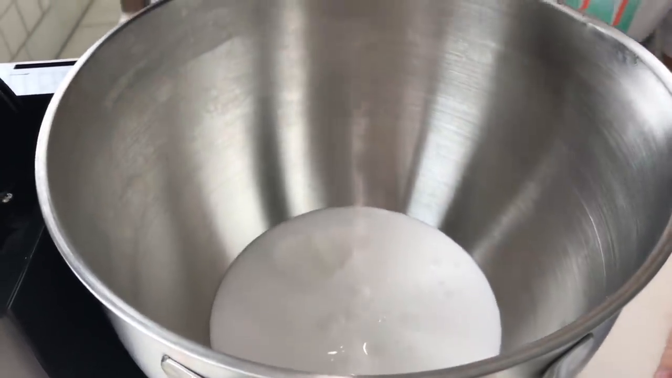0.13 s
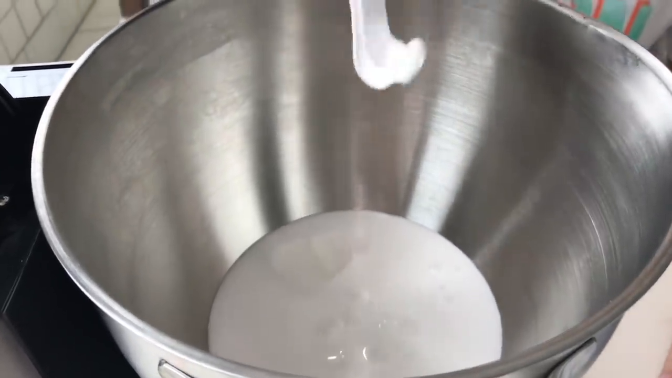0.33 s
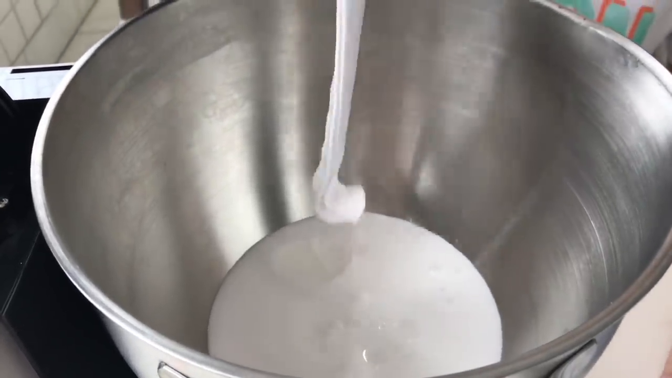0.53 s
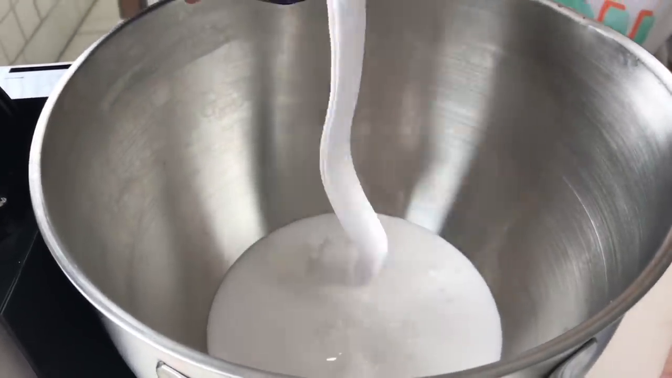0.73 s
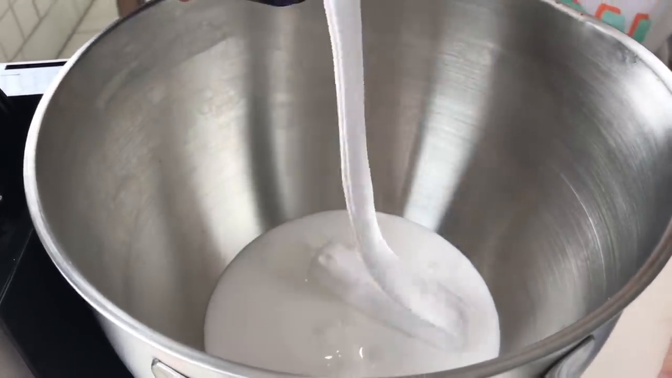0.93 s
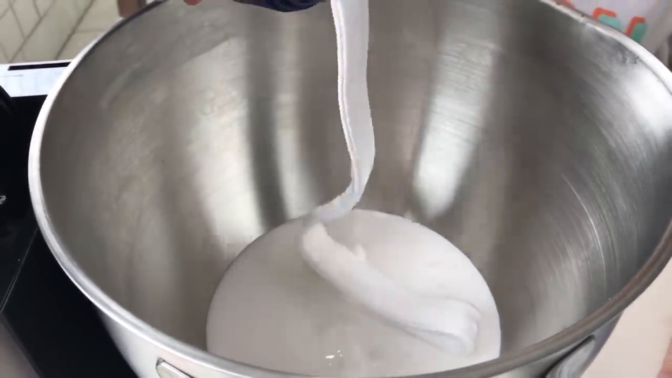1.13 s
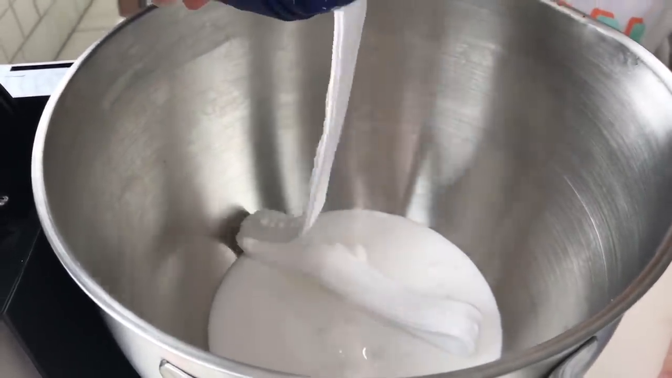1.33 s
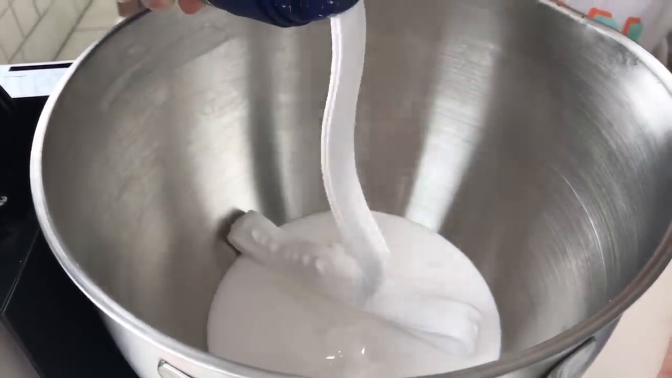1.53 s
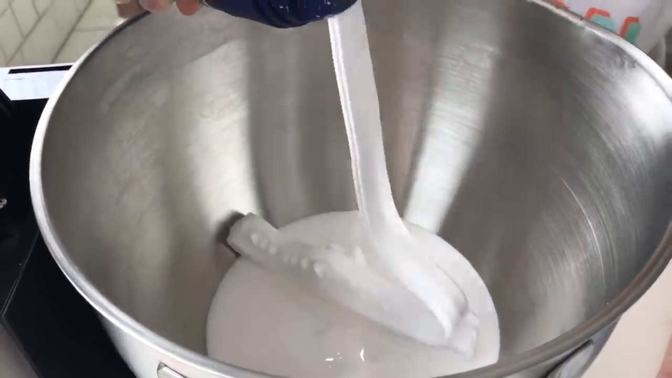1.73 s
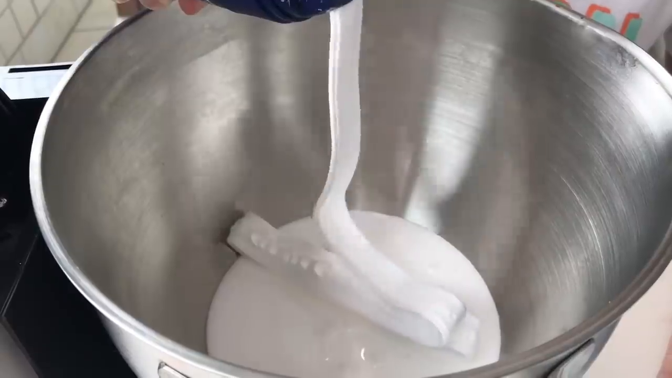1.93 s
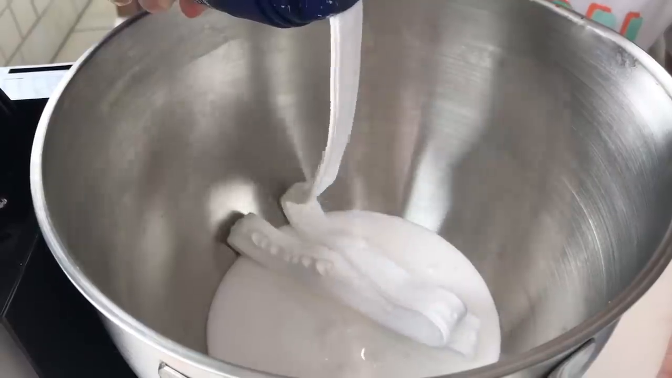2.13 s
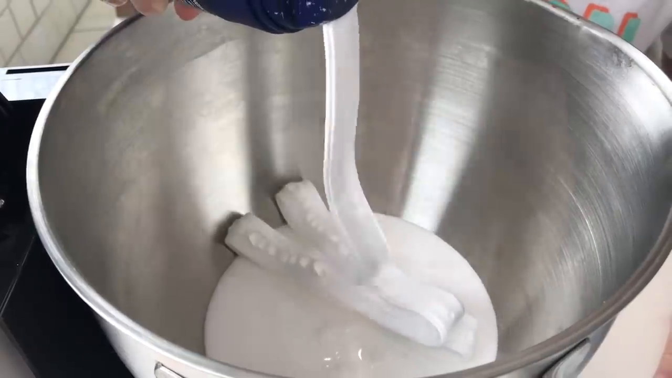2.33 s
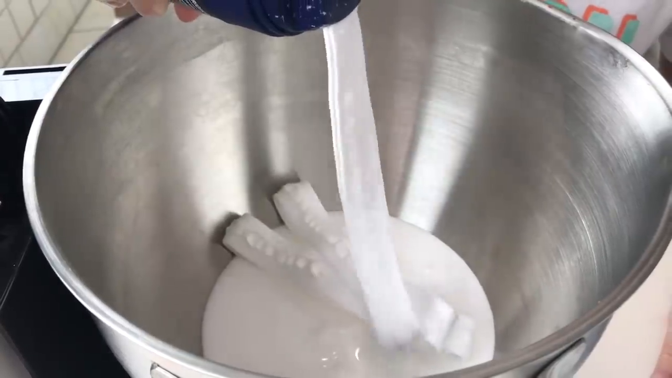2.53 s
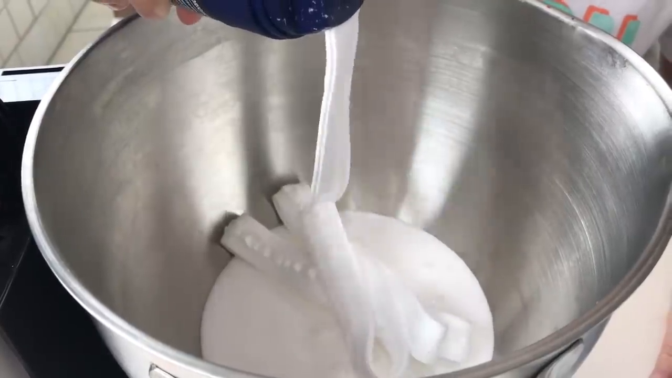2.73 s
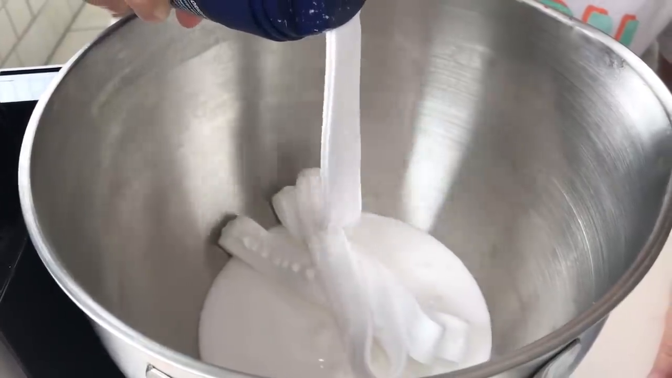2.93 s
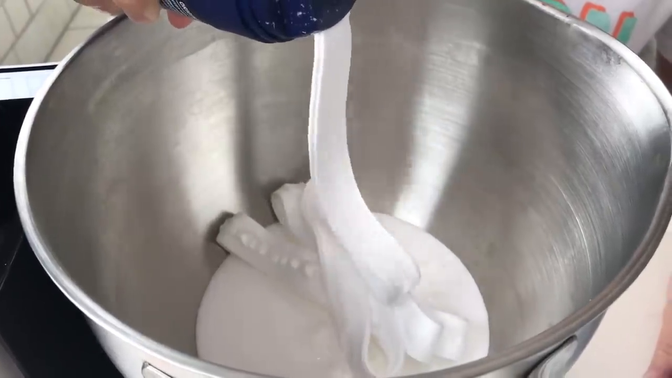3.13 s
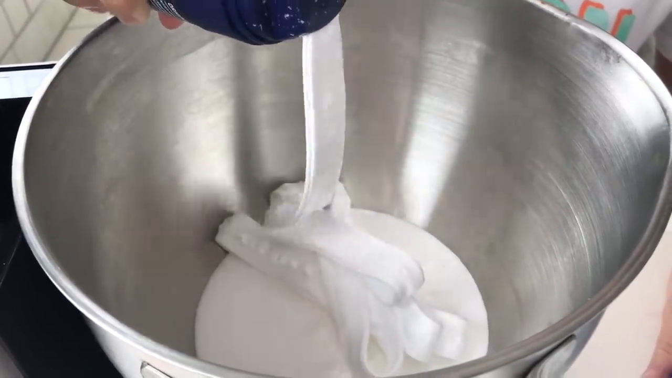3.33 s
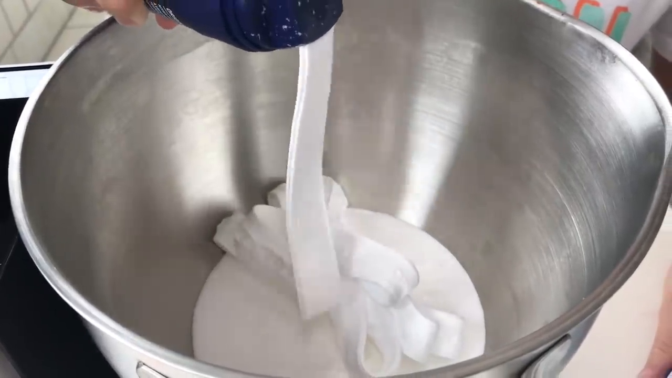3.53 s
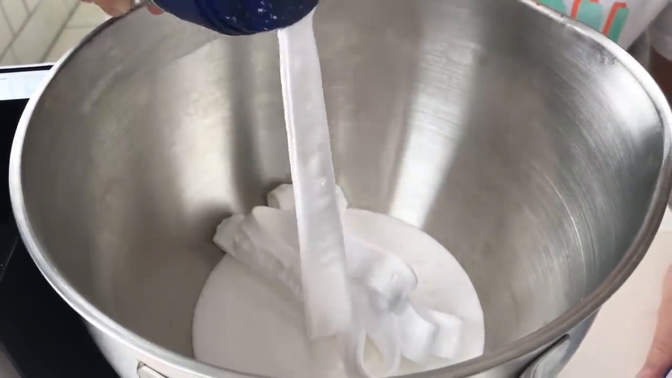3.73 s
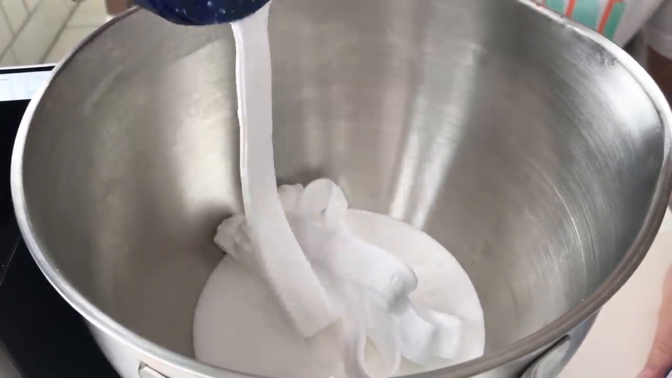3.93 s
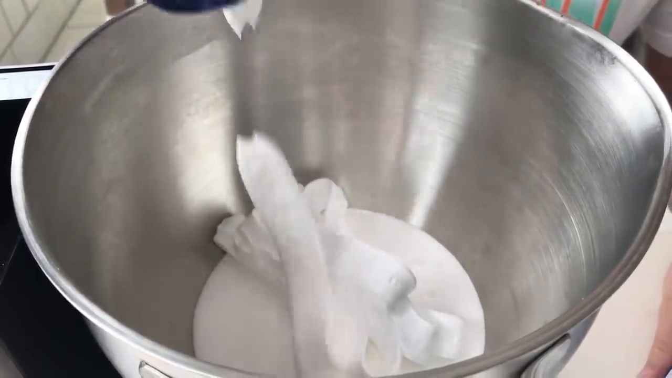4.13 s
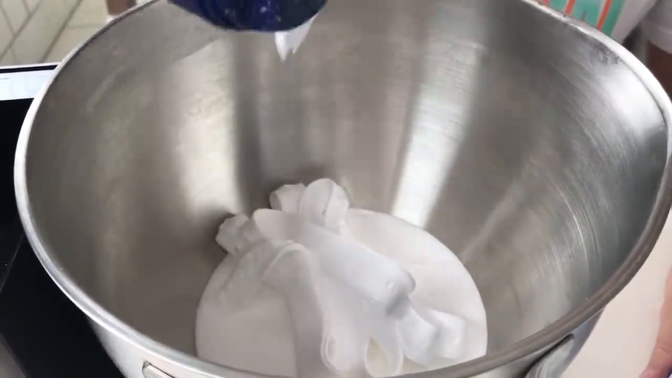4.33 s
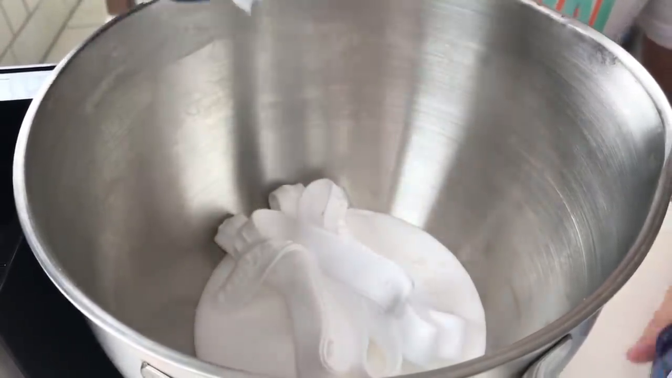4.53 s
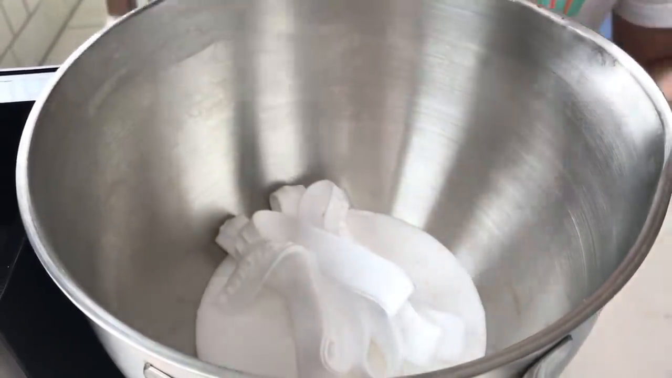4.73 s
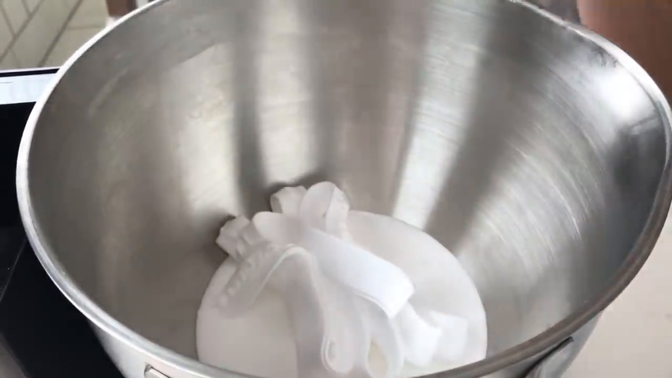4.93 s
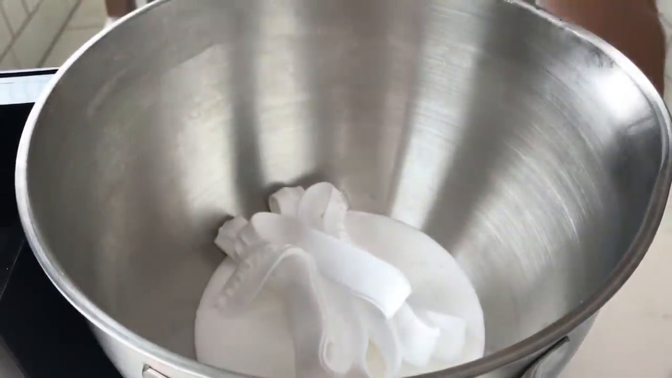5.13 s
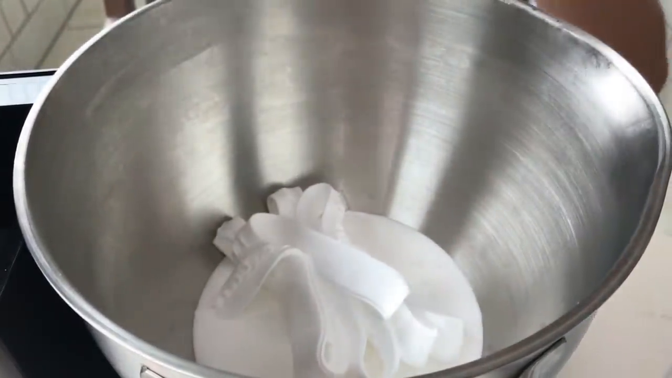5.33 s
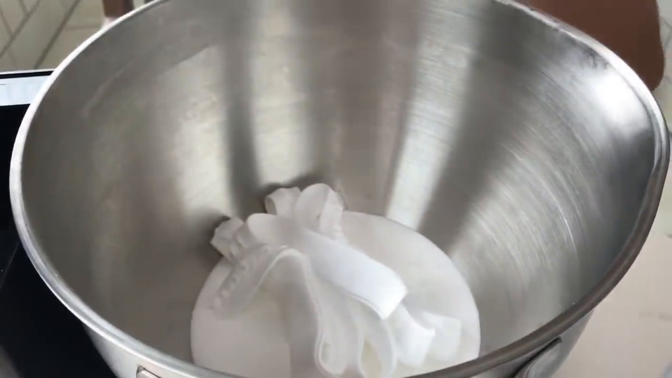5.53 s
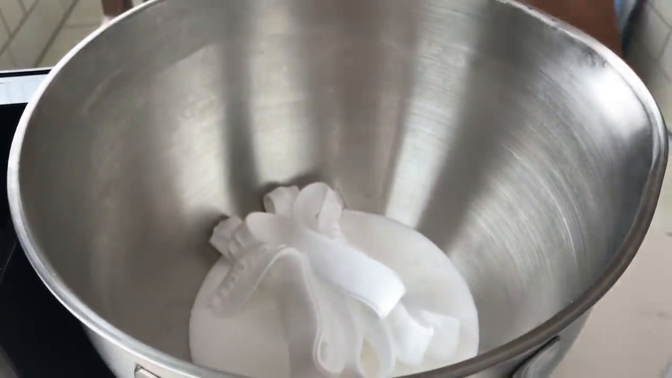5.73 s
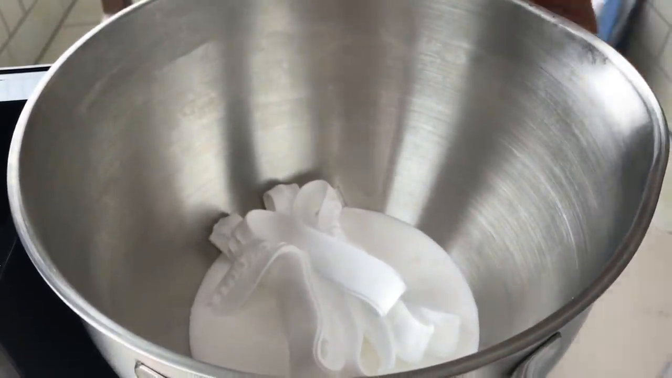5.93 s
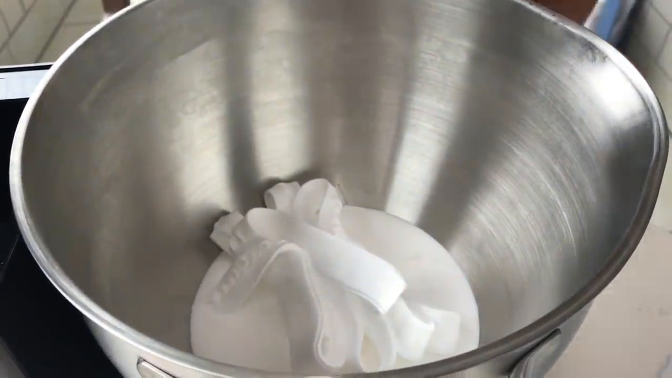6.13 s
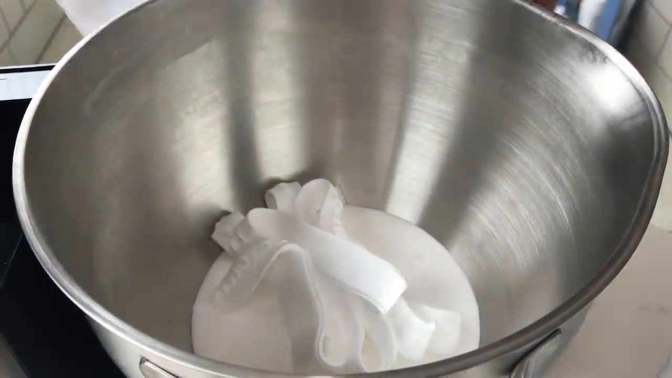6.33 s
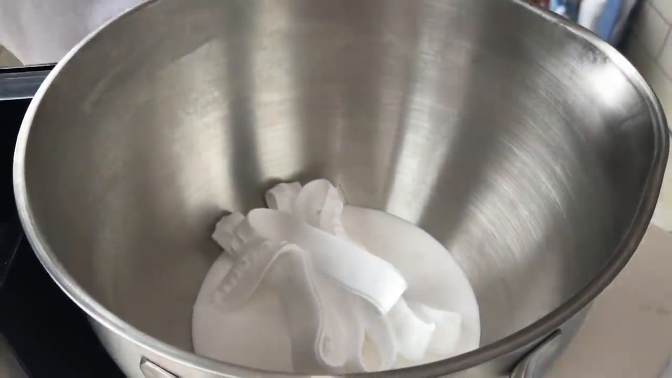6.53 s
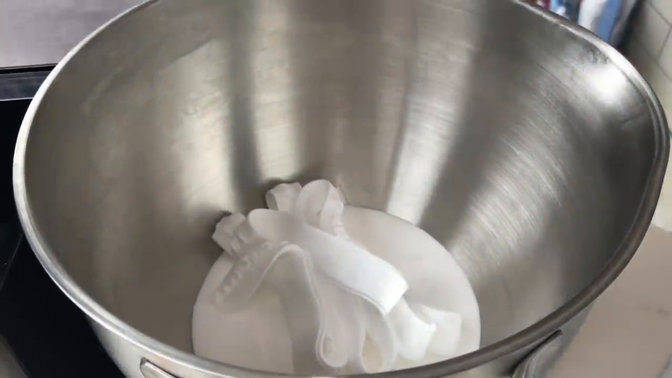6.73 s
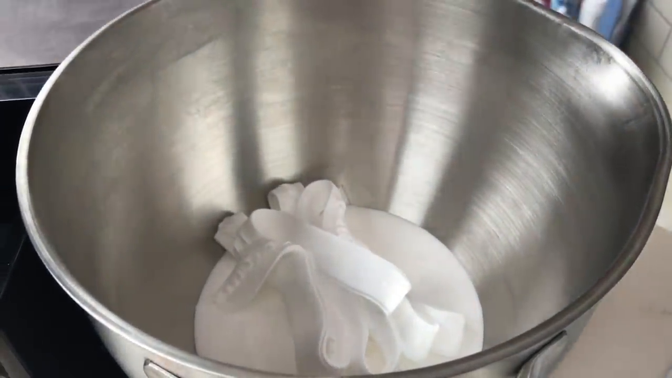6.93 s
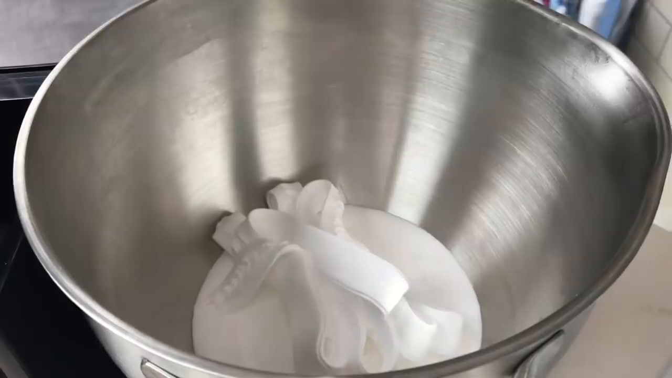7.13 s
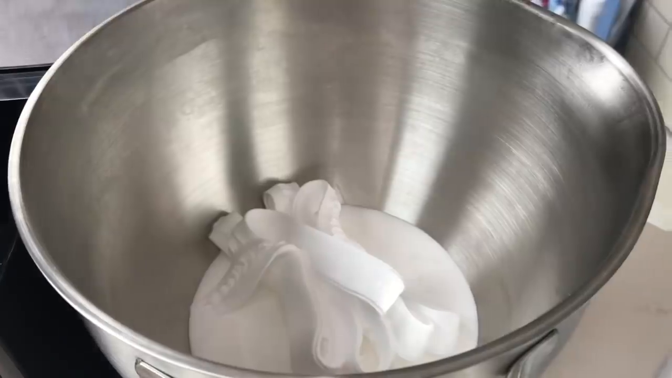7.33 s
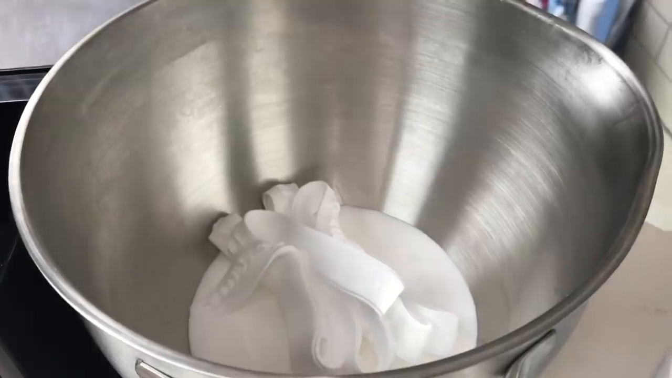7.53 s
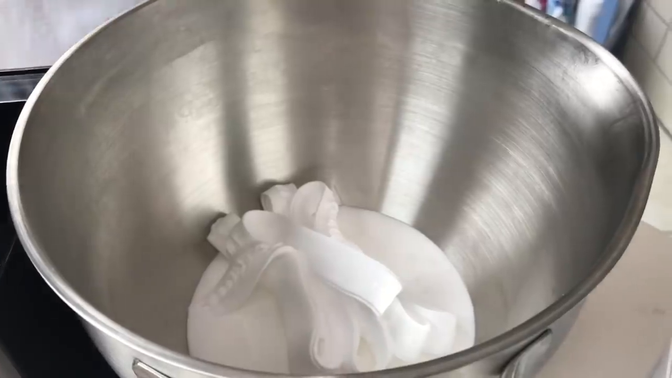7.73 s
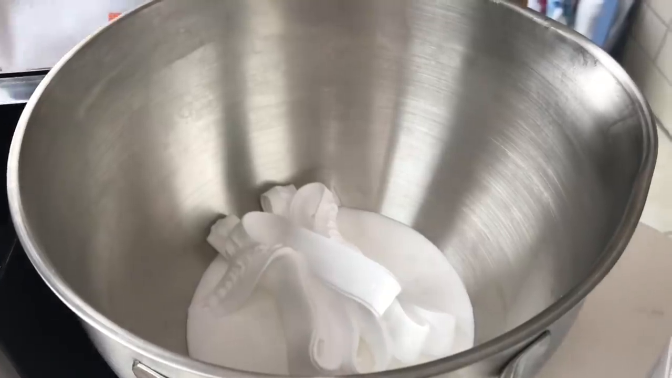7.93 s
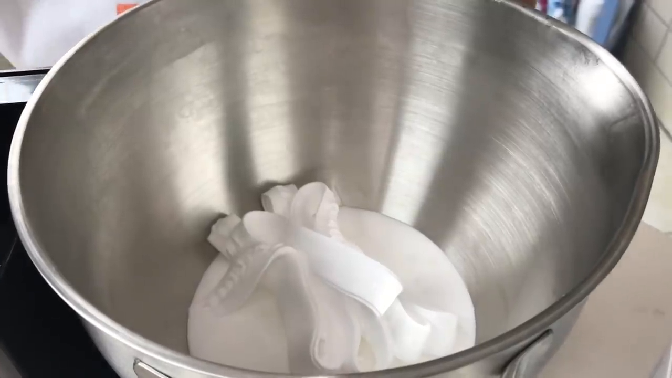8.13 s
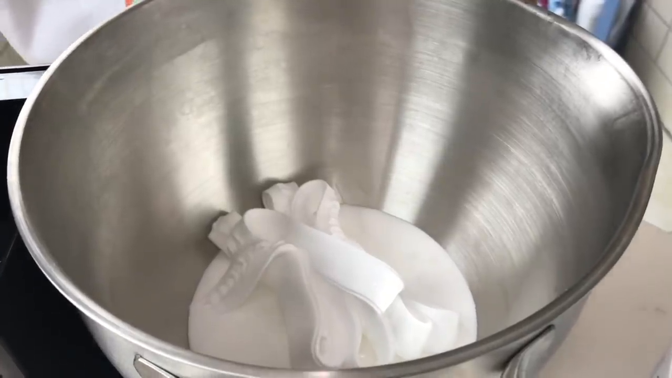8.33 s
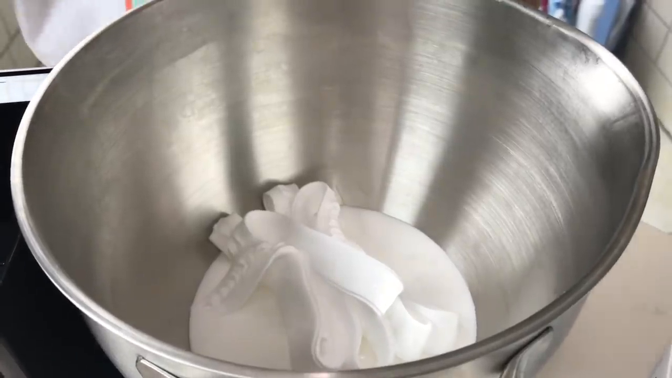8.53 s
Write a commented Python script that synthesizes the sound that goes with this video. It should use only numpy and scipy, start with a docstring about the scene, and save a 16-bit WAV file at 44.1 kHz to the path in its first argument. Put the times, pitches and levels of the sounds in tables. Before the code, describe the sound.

Foam hisses and crackles from a spray can into a metal bowl and cuts off, followed by light plastic knocks in a small room.

```python
"""An aerosol can sprays foam into a steel mixing bowl in a small hard-walled room.
Bare gas rushes out first, then foam sputters through the nozzle: a roar full of bursting gas pockets,
coloured by the bowl. Afterwards the plastic cap is handled and knocked, and something hollow drops
and bounces. Cloth and hands rustle over a low room hum."""
import sys
import numpy as np
from scipy import signal
from scipy.fft import rfft, irfft, next_fast_len
from scipy.io import wavfile

SR = 44100
rng = np.random.default_rng(int(sys.argv[2]) if len(sys.argv) > 2 else 0)


def put_to_file(sound):
    """Save the sound as 16-bit audio at rate SR, in the file named by the first command-line argument."""
    columns = np.atleast_2d(sound).T  # one column per channel
    safe = np.clip(columns, -1, 1)
    whole_steps = np.round(safe * 32767)
    wavfile.write(sys.argv[1], SR, whole_steps.astype(np.int16))


N = 383096
FFT_SIZE = next_fast_len(N + SR)
HZ = np.maximum(np.arange(FFT_SIZE // 2 + 1) * SR / FFT_SIZE, 1)
TIME = np.arange(N) / SR

# Table levels are relative, ahead of the mix gains.
# room hum (frequency [Hz], density [dB])
HUM_SPECTRUM = [(12, -57.5), (20, -22), (44, -14), (101, -3.5), (172, -8), (192, -16.5), (227, -5.5),
                (300, -16), (604, -18.5), (714, -18.5), (1150, -19), (2810, -35), (3710, -34.5),
                (4040, -37), (15900, -45.5)]
# room decay (frequency [Hz], T60 [s])
ROOM_T60 = [(200, 0.33), (600, 0.41), (1500, 0.39), (4000, 0.33), (10000, 0.05)]
# cloth and skin (time [s], half-width [s], dull level [dB], bright level [dB])
SWISHES = [(4.657, 0.065, -62, -63), (4.854, 0.12, -53.5, -59.5), (5.156, 0.015, -44, -44),
           (5.29, 0.06, -45, -44), (5.51, 0.016, -61, -49), (5.668, 0.14, -54, -55),
           (5.913, 0.018, -65.5, -47.5), (6.117, 0.091, -53.5, -52.5), (6.303, 0.13, -53, -53.5),
           (6.876, 0.051, -65.5, -44.5), (7.747, 0.043, -53.5, -56), (8.16, 0.08, -63, -56),
           (8.544, 0.038, -62, -54.5)]
# faint rubbing tones (time [s], half-width [s], level [dB], pitch [Hz])
SQUEAKS = [(6.057, 0.54, -52, 1686), (6.86, 0.1, -53, 2510)]
# hollow object landing (time [s], level [dB], tilt [dB/octave])
BOUNCES = [(7.434, 6.5, 7.5), (7.4425, 0, -4.5), (7.619, -4.5, 3), (7.777, -8, 0.5)]
# its modes (frequency [Hz], level [dB], T60 [s])
HOLLOW_MODES = [(271.6, -32, 0.57), (558, -25, 0.46), (617, -17.5, 0.36), (743, 4.5, 0.0062),
                (985, 8, 0.015), (1059, 2, 0.034), (1217, 3.5, 0.013), (1480, -4.5, 0.028),
                (1624, -5.5, 0.04), (1854, -5.5, 0.03), (2093, -9, 0.047), (2365, -3.5, 0.031),
                (2840, -2, 0.005), (3280, -12, 0.032), (4960, -20, 0.0036), (7400, -35, 0.0053)]
# dry cracks, alone or starting a knock (time [s], body level [dB], treble level [dB])
TICKS = [(0.313, -21, -14), (1.803, -16, -11.5), (3.3688, -0.5, -14), (4.616, -42, -44),
         (5.0723, -38, -43.5), (5.14, -17.5, -27), (5.169, -32, -27), (5.22, -37, -32), (5.3263, -24, -49),
         (5.3735, -17.5, -43), (5.4778, -21.5, -39), (5.505, -28, -38), (5.604, -30, -44),
         (5.8204, -24.5, -42), (5.8671, -38, -51), (5.904, -44, -44), (6.3654, -12, -32), (7.4337, 2, -20),
         (7.54, -22, -52), (7.6195, -13, -51), (7.7756, -22.5, -57), (8.096, -21.5, -34.5),
         (8.5214, -30.5, -38)]
# blows on the worktop (time [s], level [dB], tilt [dB/octave])
THUDS = [(4.750, -28, 3), (5.376, -14.5, -4.5), (5.479, -6.5, -6), (6.365, -28.5, 11.5), (7.435, -33, -7)]
# its modes (frequency [Hz], level [dB], T60 [s])
WORKTOP_MODES = [(107, -36, 0.043), (172, -20.5, 0.25), (217, -27.5, 0.12), (266, -12.5, 0.04),
                 (307, 5.5, 0.03)]
# cap knocking on the can (time [s], level [dB], tilt [dB/octave])
CAP_HITS = [(5.139, -19, -5), (5.168, -19, 9), (5.324, -7.5, -0.5), (5.360, -5.5, -9), (6.365, -18, 3)]
# its modes (frequency [Hz], level [dB], T60 [s])
CAP_MODES = [(517, -24, 0.014), (945, -3, 0.021), (1240, -5.5, 0.0056), (1733, -4, 0.015),
             (2680, -20, 0.016), (4410, -21, 0.018)]
# cap rubbing along its seat (time [s], level [dB])
CAP_SLIDE = [(5.12, -49), (5.184, -48), (5.308, -41), (5.364, -56), (5.45, -59.5)]
# whistles as the valve opens and as foam arrives
# (time [s], level [dB], pitch [Hz], bandwidth [Hz], rise [s], fall [s])
WHISTLES = [(0.029, -11.5, 4050, 150, 0.0047, .008), (.035, -9.5, 6220, 250, 0.0066, .01),
            (0.041, -10, 9760, 300, 0.0093, .015), (.169, 2.5, 4400, 600, 0.0091, .005)]
# bare gas (frequency [Hz], density [dB])
RUSH_SPECTRUM = [(40, -30), (300, -32.5), (1000, -19), (2500, -13), (3500, -8.5), (6000, -3.5), (9000, -2),
                 (16000, -2)]
# empty nozzle resonances (frequency [Hz], width [Hz], gain [dB])
NOZZLE_MODES = [(3500, 280, 15), (5640, 480, 6.5), (6900, 200, 4.5), (8610, 380, 9), (10340, 230, 10),
                (11060, 170, 10), (11850, 450, 9.5), (13850, 450, 6.5), (14500, 200, 5.5), (15060, 200, 6)]
# foam flow (time [s], level [dB], small pockets re flow [dB], thin pockets re flow [dB],
# centre pitch of small pockets and pops [Hz])
FOAM_FLOW = [(0.102, -32, 8.5, 9.5, 3880), (0.17, -29, 4.5, 14.5, 3950), (0.22, -29, 8, 3.5, 3780),
             (0.35, -26.5, -4.5, -2.5, 3700), (0.42, -24, 1.5, -2.5, 2950), (0.62, -24, 5.5, 0, 3330),
             (0.8, -22.5, -0.5, -6.5, 4100), (1.3, -25, 3, -4.5, 3530), (1.7, -22, -6, -8.5, 3500),
             (2.301, -22, -8, -9.5, 3500), (2.7, -21.5, 0, -4.5, 2950), (2.901, -19.5, -2.5, -3, 3100),
             (3.35, -21, 1.5, 1.5, 3500), (3.45, -22, 4, 5, 3360), (3.63, -19.5, -5.5, -4.5, 3320)]
# foam roar (frequency [Hz], density [dB])
ROAR_SPECTRUM = [(60, -36), (150, -5.5), (500, -4), (1000, -8.5), (1300, -0.5), (1800, -1.5), (2500, -18.5),
                 (5000, -17), (16000, -31)]
# gas hiss in the foam (frequency [Hz], density [dB])
HISS_SPECTRUM = [(100, -31), (1000, -28.5), (2500, -16.5), (3500, -14), (6000, -2), (9000, 6),
                 (16000, -0.5)]
# thin, high pockets (time [s], centre pitch [Hz])
THIN_PITCH = [(0.2, 6000), (0.65, 7200), (1.5, 6300), (2.2, 7400), (3.0, 6800), (3.4, 6000)]
# biggest pockets bursting (time [s], level [dB], pitch [Hz])
BURSTS = [(0.3215, 4, 4300), (0.3673, -4, 2630), (0.3954, 6, 2980), (0.4354, 4, 2700), (0.477, 4.5, 2770),
          (0.5305, -7, 2660), (0.5685, 3, 2600), (0.603, 0.5, 2680), (0.654, 1, 2680), (0.685, 3, 2650),
          (0.7543, 1, 4470), (0.7787, 0.5, 4300), (0.89, 1.5, 3190), (0.9524, 8.5, 4400), (1.0714, 9, 4040),
          (1.098, 4, 3620), (1.1665, -3.5, 2540), (1.1904, 3.5, 3170), (1.2346, 4, 3700),
          (1.3769, -4, 4460), (1.544, -16, 3300), (1.5973, -8, 2700), (1.6276, 0.5, 2710),
          (1.8005, 3, 3800), (1.905, -8, 2640), (2.099, -14, 3230), (2.204, 1, 3780), (2.2417, -1, 4370),
          (2.2671, 4, 4300), (2.3053, -3.5, 2580), (2.403, -2, 4230), (2.6792, -2.5, 3150),
          (2.7175, -4, 3850), (2.7423, -16, 2160), (2.883, -6, 2180), (3.103, -1, 3200), (3.133, 3, 3750),
          (3.156, 4, 3700), (3.3393, 3, 3560), (3.3702, 10.5, 3770)]
# air resonances and dips of the bowl (frequency [Hz], width [Hz], gain [dB])
BOWL_MODES = [(212.2, 22, 10.5), (537, 40, 8), (722, 120, -11), (1238, 52, 6.5), (1370, 810, 6),
              (1920, 140, -8), (2158, 120, 8.5), (2630, 580, 11), (2950, 160, -6), (3190, 330, 8.5),
              (3798, 334, 10), (4400, 340, 12), (5700, 87, 8), (6120, 360, 6.5), (6680, 250, 4.5),
              (7230, 190, 6), (7880, 92, 4), (8410, 190, 2.5)]

OPEN_S, FOAM_S, SHUT_S = 0.023, 0.1672, 3.624   # valve opens, foam reaches the nozzle, valve shuts
BOWL_ECHO_S = 0.00171   # round trip, nozzle to bowl floor


def from_db(db):
    """Decibels to gain."""
    return 10 ** (np.asarray(db) / 20)


def unit_rms(x):
    """Scale to rms 1."""
    return x / np.sqrt(np.mean(x ** 2) + 1e-20)


def band(x, low_hz, high_hz):
    """Band-pass."""
    return signal.sosfilt(signal.butter(2, [low_hz, high_hz], "band", fs=SR, output="sos"), x)


def swell(at_s, half_width_s):
    """Gaussian envelope."""
    return np.exp(-((TIME - at_s) / half_width_s) ** 2)


def spectrum_db(points):
    """Spectrum table interpolated over log frequency."""
    hz, db = np.transpose(points)
    return np.interp(np.log(HZ), np.log(hz), db)


def peaks_db(modes):
    """Bell-shaped peaks and dips, summed in dB."""
    return sum(db / (1 + (2 * (HZ - hz) / width_hz) ** 2) for hz, width_hz, db in modes)


def colour(x, response_db):
    """Minimum-phase filter of given magnitude."""
    cepstrum = irfft(response_db * np.log(10) / 20, FFT_SIZE)
    cepstrum[1:FFT_SIZE // 2] *= 2
    cepstrum[FFT_SIZE // 2 + 1:] = 0
    return irfft(rfft(x, FFT_SIZE) * np.exp(rfft(cepstrum)), FFT_SIZE)[:N]


def shaped_noise(response_db):
    """Coloured noise, rms 1."""
    return unit_rms(colour(rng.standard_normal(N), response_db))


def drift(rate_hz):
    """Low-passed random fluctuation, rms 1."""
    r = np.exp(-2 * np.pi * rate_hz / SR)
    return unit_rms(signal.lfilter([1], [1, -2 * r, r * r], rng.standard_normal(N + SR))[SR:])


def ring(drive, hz, t60_s):
    """Resonator: a unit click starts a decaying unit sine."""
    r, w = from_db(-60 / (t60_s * SR)), 2 * np.pi * hz / SR
    return signal.lfilter([0, np.sin(w)], [1, -2 * r * np.cos(w), r * r], drive + 1e-18)


def strike(hits, modes, mode_ratio, contact_s):
    """Each blow rings all modes, tilted by contact hardness and low-passed by contact time."""
    out, scatter_db = np.zeros(N), rng.standard_normal((len(hits), len(modes)))
    at_s, hit_db, db_per_octave = np.transpose(hits)
    pivot_hz = modes[len(modes) // 4][0]
    for k, (hz, mode_db, t60_s) in enumerate(modes):
        db = hit_db + mode_db + db_per_octave * np.log2(hz / pivot_hz) + scatter_db[:, k]
        clicks = np.zeros(N)
        clicks[np.round(at_s * SR).astype(int)] = mode_ratio ** k * from_db(db)
        out += ring(clicks, hz, t60_s)
    r = np.exp(-1 / (contact_s * SR))
    return signal.lfilter([1 - r], [1, -r], out)


def puffs(times_s, levels_db, decay_s):
    """Sudden, fast-decaying puffs of white noise."""
    out, t = np.zeros(N + 1000), np.arange(1000) / SR
    for at_s, db in zip(times_s, levels_db):
        at = round(at_s * SR)
        out[at:at + 1000] += from_db(db) * rng.standard_normal(1000) * np.exp(-t / decay_s)
    return out[:N]


def room_hum():
    """Steady low noise."""
    return from_db(-43.5) * shaped_noise(spectrum_db(HUM_SPECTRUM))


def room_echoes(x):
    """Dense wall echoes: octave bands of noise, each with its own decay."""
    t = np.arange(SR * 2 // 3) / SR
    hz, decays_s = np.transpose(ROOM_T60)
    echoes = 0
    for low_hz in 90 * 2. ** np.arange(8):
        t60_s = np.interp(np.log(low_hz * np.sqrt(2)), np.log(hz), decays_s)
        octave = band(rng.standard_normal(len(t)), low_hz, min(2 * low_hz, 0.45 * SR))
        echoes += octave * from_db(-60 * t / t60_s)
    echoes *= np.clip((t - 0.003) / 0.0023, 0, 1)   # first wall after 3 ms
    echoes /= np.sqrt(np.sum(echoes ** 2))
    return irfft(rfft(x, FFT_SIZE) * rfft(echoes, FFT_SIZE), FFT_SIZE)[:N]


def rustle():
    """Cloth and skin rub: grainy noise, broad for swishes, resonant for squeaks."""
    grain = rng.standard_normal(N) * from_db(2 * drift(120))
    dull, bright = unit_rms(band(grain, 2100, 4140)), unit_rms(band(grain, 4000, 19000))
    swishes = sum(swell(at_s, width_s) * (from_db(dull_db) * dull + from_db(bright_db) * bright)
                  for at_s, width_s, dull_db, bright_db in SWISHES)
    squeaks = sum(swell(at_s, width_s) * from_db(db) * unit_rms(ring(grain, hz, t60_s=0.009))
                  for at_s, width_s, db, hz in SQUEAKS)
    return swishes + squeaks


def hollow_drop():
    """A hollow object rings at each bounce."""
    return from_db(-5) * strike(BOUNCES, HOLLOW_MODES, mode_ratio=-0.93, contact_s=50e-6)


def ticks():
    """Dry cracks in a body band and a treble band."""
    at_s, body_db, treble_db = np.transpose(TICKS)
    body = band(puffs(at_s, body_db + 0.5, decay_s=0.0024), 740, 4100)
    treble = band(puffs(at_s, treble_db + 5.5, decay_s=0.002), 5660, 11590)
    return body + treble


def handling():
    """The cap rubs on its seat and knocks on the can; worktop thuds, ticks."""
    rub = rng.standard_normal(N) * from_db(3.76 * drift(200))
    rubbed_cap = ring(rub, 1000, 0.053) + from_db(0.5) * ring(rub, 1780, 0.03) + from_db(2.5) * rub
    slide_db = np.interp(TIME, *np.transpose(CAP_SLIDE), left=-120, right=-120)
    knocks = strike(CAP_HITS, CAP_MODES, mode_ratio=-0.93, contact_s=50e-6)
    thuds = -strike(THUDS, WORKTOP_MODES, mode_ratio=0.8, contact_s=95e-6)
    return from_db(slide_db) * unit_rms(rubbed_cap) + knocks + thuds + ticks()


def nozzle_squeal(peak_s=3.33, rise_s=0.45, fall_s=0.1, end_hz=3700, sag_hz_per_s=1500):
    """The foam-filled nozzle squeals faintly: a rough tone, sagging until its peak."""
    hz = end_hz + sag_hz_per_s * np.clip(peak_s - TIME, 0, 1)
    level = from_db(-20) * swell(peak_s, np.where(TIME < peak_s, rise_s, fall_s))
    return level * drift(110) * np.sin(2 * np.pi * np.cumsum(hz) / SR)


def valve_whistles():
    """Noise in narrow resonances, each under a quick swell."""
    out, noise = np.zeros(N), rng.standard_normal(N)
    for at_s, db, hz, width_hz, rise_s, fall_s in WHISTLES:
        narrow = unit_rms(band(noise, hz - width_hz / 2, hz + width_hz / 2))
        out += from_db(db) * swell(at_s, np.where(TIME < at_s, rise_s, fall_s)) * narrow
    return out


def gas_rush():
    """Bare gas leaks, rushes through the opened valve, then is choked by foam."""
    open_db_per_s, grow_db_per_s, choke_db_per_s, fade_db_per_s = 2598, 150, 1000.5, 201.5
    leak_db, start_db, full_db, choked_db = -42.5, -13.5, -1.1, -13.5
    db = np.minimum(start_db + grow_db_per_s * (TIME - OPEN_S), full_db)
    db = np.maximum(db - open_db_per_s * np.maximum(OPEN_S - TIME, 0), leak_db)
    choked_s = np.maximum(TIME - FOAM_S, 0)
    db += np.maximum(-choke_db_per_s * choked_s, choked_db - fade_db_per_s * choked_s)
    bright = from_db(db) * shaped_noise(spectrum_db(RUSH_SPECTRUM) + peaks_db(NOZZLE_MODES))
    blow = from_db(-28.5 + 0.5 * db)
    plop = from_db(-17.5) * swell(0.171, 0.014)   # first plug of foam blown out
    return bright + (blow + plop) * unit_rms(band(rng.standard_normal(N), 60, 3000))


def valve_shut_db(shut_db_per_s=411, dribble_db=-14.5, dribble_db_per_s=172):
    """Flow loss as the valve shuts: fast drop, slower dribble."""
    since_s = np.maximum(TIME - SHUT_S, 0)
    return np.maximum(-shut_db_per_s * since_s, dribble_db - dribble_db_per_s * since_s)


def pockets(centre_hz, log_spread, base_per_s, size_db, t60_cycles):
    """Gas pockets burst in random clumps, pitches scattered round the centre."""
    sizes = from_db(size_db * np.minimum(rng.exponential(1, N), 4)) * rng.choice([-1, 1], N)
    clicks = sizes * (rng.random(N) < base_per_s * from_db(3 * drift(40)) / SR)
    bank_hz = np.geomspace(1800, 9000, 16)
    pitch_hz = centre_hz * np.exp(log_spread * rng.standard_normal(N))
    slot = np.searchsorted(bank_hz, pitch_hz).clip(0, 15)
    out = np.zeros(N)
    for k, hz in enumerate(bank_hz):
        ringing = ring(clicks * (slot == k), hz, t60_cycles / hz)
        out += hz * ring(ringing, hz, t60_cycles / hz)   # wet walls soften each onset
    return unit_rms(out)


def bursts(events, rise_cycles, echo_db):
    """Each burst is a wavelet bouncing between bowl and can, inverted every round trip."""
    out, t = np.zeros(N + 2000), np.arange(500) / SR
    for at_s, db, hz in events:
        age = t * hz / rise_cycles
        wavelet = np.sin(2 * np.pi * hz * t) * age * np.exp(1 - age)
        for trip in range(4):
            at = round((at_s + trip * BOWL_ECHO_S) * SR)
            out[at:at + 500] += from_db(db + echo_db * trip) * (-1) ** trip * wavelet
    return out[:N]


def pops(level, centre_hz, per_s=55, spread_db=3.5):
    """The nozzle fills and lets go: a jittered train of bursts, each with a bright spit."""
    gap, size, pitch = rng.standard_normal((300, 3)).T
    times_s = np.cumsum(np.exp(0.5 * gap) / per_s)
    at = np.clip((times_s * SR).astype(int), 0, N - 1)
    db = 13 + spread_db * size + 20 * np.log10(level[at] + 1e-9)
    hz = centre_hz[at] * np.exp(0.15 * pitch)
    spit = band(puffs(at / SR, db - 17.5, decay_s=0.0048), 5500, 14000)
    return bursts(zip(at / SR, db, hz), rise_cycles=0.46, echo_db=-13) + spit


def foam_spray():
    """Roar, hiss and bursting pockets leave the nozzle and sound through the bowl."""
    times_s, *columns = np.transpose(FOAM_FLOW)
    flow_db, small_db, thin_db, centre_hz = [np.interp(TIME, times_s, c) for c in columns]
    thin_hz = np.interp(TIME, *np.transpose(THIN_PITCH))
    shut_db = valve_shut_db()
    flow = from_db(flow_db + shut_db) * (TIME > times_s[0])
    sputter = drift(60)   # stuttering flow: roar and hiss flicker together
    roar = from_db(-5 + 1.6 * sputter) * shaped_noise(spectrum_db(ROAR_SPECTRUM))
    hiss_db = -5.5 + 0.75 * thin_db + 2 * sputter - 0.2 * shut_db   # lingers after shut-off
    hiss = from_db(hiss_db) * shaped_noise(spectrum_db(HISS_SPECTRUM) + 0.13 * peaks_db(NOZZLE_MODES))
    small = pockets(centre_hz, log_spread=0.2, base_per_s=450, size_db=4.5, t60_cycles=2.9)
    thin = pockets(thin_hz, log_spread=0.08, base_per_s=670, size_db=5.5, t60_cycles=13)
    crackle = from_db(small_db - 8) * small + from_db(thin_db - 6.5) * thin
    popping = pops(flow * from_db(small_db / 2), centre_hz)
    big = from_db(-6) * bursts(BURSTS, rise_cycles=0.41, echo_db=-10.5)
    return colour(flow * (roar + hiss + crackle) + popping + big, peaks_db(BOWL_MODES))


def scene():
    """Mono mix; handling and drop are wetter than the spray."""
    spray = gas_rush() + foam_spray() + valve_whistles() + nozzle_squeal()
    knocks = handling() + hollow_drop()
    hum = room_hum()
    wet = room_echoes(from_db(-13) * spray + from_db(-8.5) * knocks)
    low_cut = signal.butter(2, 90, "high", fs=SR, output="sos")   # small sources radiate no deep bass
    return (signal.sosfilt(low_cut, spray + knocks + wet) + rustle() + hum)[None]


def record(dry, cutoff_hz=16050):
    """Input overload flattens the peaks; a steep low-pass cuts the top."""
    flattened = dry / (1 + np.abs(dry) ** 6) ** (1 / 6)
    low_pass = signal.cheby2(20, 55, cutoff_hz, fs=SR, output="sos")
    return np.clip(signal.sosfilt(low_pass, flattened), -1, 1)


dry = scene()
out = record(dry)
put_to_file(out)
```